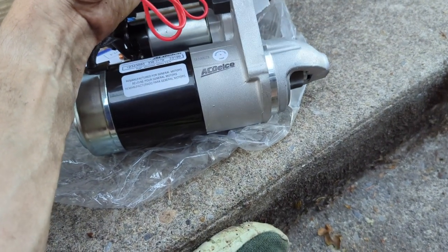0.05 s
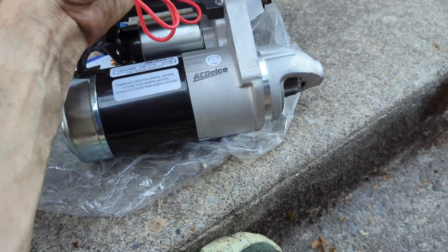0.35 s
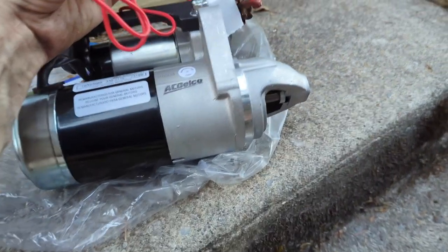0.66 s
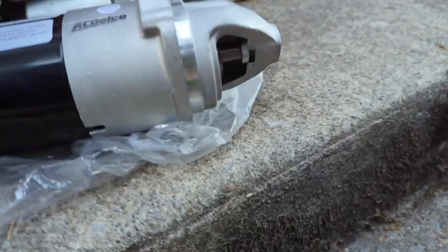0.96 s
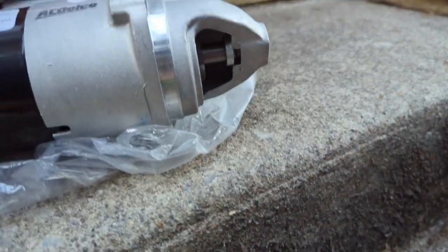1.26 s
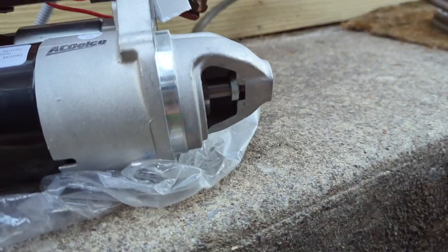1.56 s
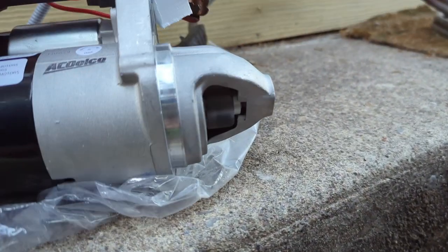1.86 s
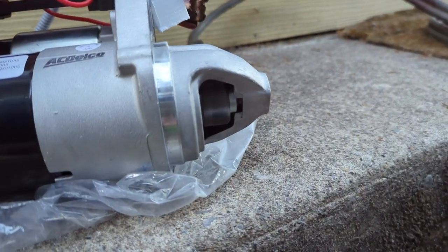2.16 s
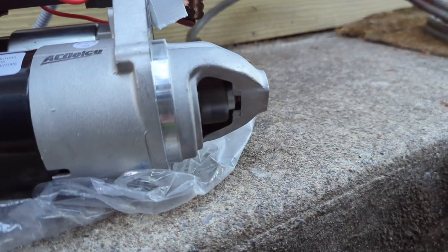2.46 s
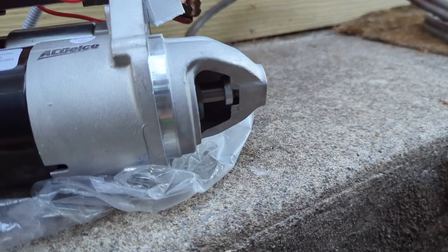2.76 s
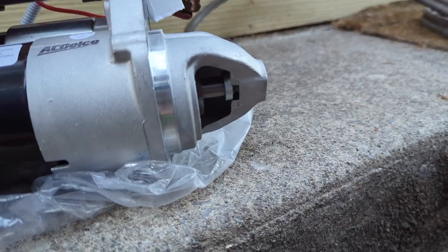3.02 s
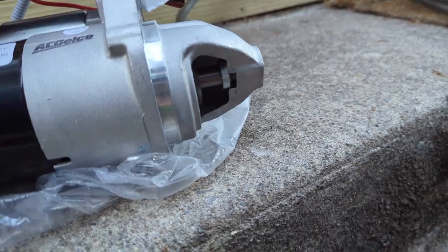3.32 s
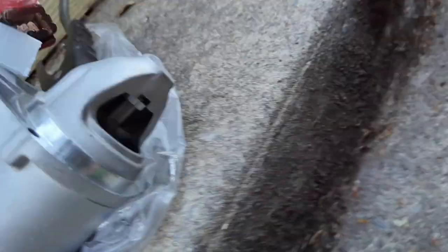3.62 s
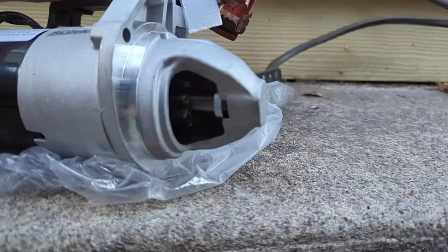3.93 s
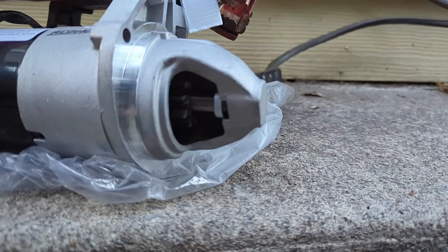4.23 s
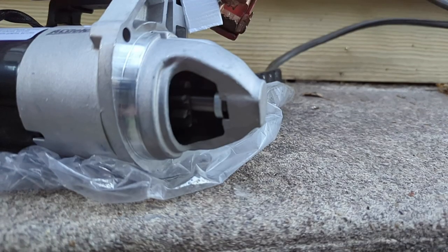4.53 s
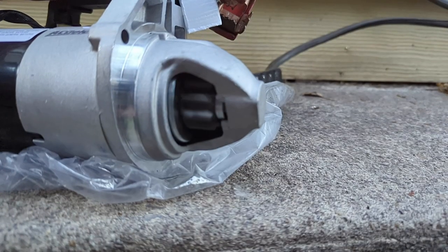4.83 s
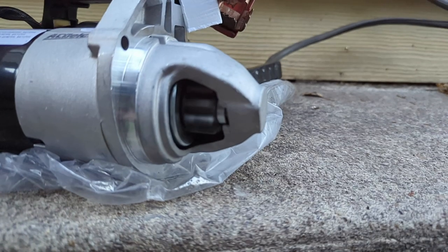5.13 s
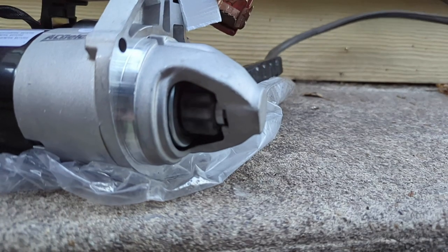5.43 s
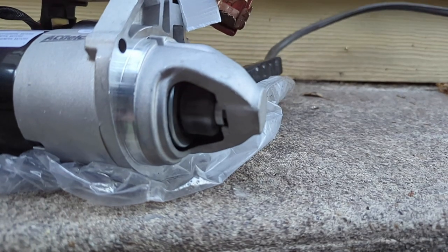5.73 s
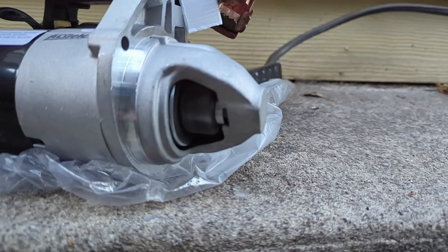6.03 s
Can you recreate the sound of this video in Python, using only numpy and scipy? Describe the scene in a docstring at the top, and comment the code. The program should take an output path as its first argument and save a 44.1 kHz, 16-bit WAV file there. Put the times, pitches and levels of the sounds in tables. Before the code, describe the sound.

A car starter motor whines and coasts down twice with sharp clacks, then sounds slowed down: deep knocks and a rising growl.

```python
"""A rising whine and scrape, then a clack: a car starter motor runs unloaded on a concrete step outdoors,
a phone's two microphones close to its nose. It spins up and coasts down twice. The solenoid clacks in
and out, 23 commutator bars whine and scrape under the brushes, the reduction gear rattles. Then time slows
eightfold: a low hush, and a third start as deep knocks, a beating tone and a slowly rising growl."""
import sys
import numpy as np
from scipy import signal
from scipy.fft import rfft, irfft, next_fast_len
from scipy.io import wavfile
from scipy.ndimage import uniform_filter1d, minimum_filter1d, map_coordinates

SR = 44100
rng = np.random.default_rng(int(sys.argv[2]) if len(sys.argv) > 2 else 0)


def unload_wav(signal):
    """Save mono or channel-first audio to the path in sys.argv[1] as 16-bit WAV at rate SR, clipped to [-1, 1]."""
    wavfile.write(
        sys.argv[1],
        SR,
        np.round(np.clip(np.atleast_2d(signal).T, -1, 1) * 32767).astype(np.int16),
    )


N = 272538
SLOW, SLOW_FROM_S = 8, 3.9
BARS, PINION_RATIO = 23, 4.93  # commutator bars; armature turns to one pinion turn
FREE_HZ = 6457  # bars passing a brush each second at full unloaded speed

# Bright scrape of the brushes at natural speed. Each row: frequency in Hz, level in dB.
BRUSH_SPECTRUM = [(150, -44.5), (700, -9), (2700, -8.5), (3400, -2.5), (4000, -8), (5200, -0.5),
                  (6600, 3.5), (7600, -0.5), (9000, 4), (9800, -3.5), (11800, 6.5), (12800, 2), (14000, 2),
                  (16000, -3), (16900, -22.5), (23500, -18), (26000, -68)]
# Duller rattle of the gears at natural speed. Each row: frequency in Hz, level in dB.
GEAR_SPECTRUM = [(30, -26.5), (110, -9), (260, -13), (480, -13), (750, -7), (1150, 2), (1600, 0.5),
                 (2400, -9.5), (5000, -9.5), (14000, -91)]


def undb(db):
    """Decibels to amplitude."""
    return 10 ** (np.asarray(db) / 20)


def unit(x):
    """Scale to rms 1."""
    return x / np.sqrt(np.mean(x ** 2) + 1e-18)


def lookup(hz, points):
    """Value of (Hz, value) points on a log-frequency axis."""
    f, value = np.transpose(points)
    return np.interp(np.log(hz + 1), np.log(np.sort(f)), value)


def shape(x, response):
    """Filter x with a response given as a function of frequency."""
    size = next_fast_len(x.shape[-1] + 8192)
    hz = np.arange(size // 2 + 1) * SR / size
    return irfft(rfft(x, size) * response(hz), size)[..., :x.shape[-1]]


def colour(x, points, slow=1, tilt_db=0):
    """Give x a spectrum, lowered by the slow-down and tilted per octave; rms 1."""
    return unit(shape(x, lambda f: undb(lookup(f * slow, points) + tilt_db * np.log2(f / SR + 1e-4))))


def walk(t, rate):
    """Smooth random drift with rate new values per unit of t, spread near 1."""
    return map_coordinates(rng.standard_normal(4096), [t * rate], order=2, mode="wrap")


def add(out, start_s, x):
    """Mix x into out from start_s."""
    i = max(int(start_s * SR), 0)
    out[:, i:i + x.shape[1]] += x[:, :out.shape[1] - i]


def slowdown(s):
    """How many times slower than life the sound runs at time s."""
    return SLOW if s > SLOW_FROM_S else 1


def mics(x, slow, scatter_db, lead_rad=0.67, scatter_s=0.0077, lag_s=0):
    """Two close microphones, the left ahead for a positive lead; step and wall scatter echoes to each."""
    # Balance at natural speed and slowed. Each row: frequency as heard in Hz, left minus right in dB.
    natural_balance = [(100, 5.5), (700, 3.5), (1300, -3), (2400, -0.5), (3400, 1.5), (4600, 2),
                       (8000, 4.5), (12000, 13.5)]
    slowed_balance = [(100, 0.8), (200, 0.35), (400, 6.7), (700, 4.9), (1300, 5.1), (2400, 11.9)]
    balance = natural_balance if slow == 1 else slowed_balance
    side = np.array([[1], [-1]])
    t = np.arange(1024 * slow) / SR / slow
    echoes = rng.standard_normal((2, len(t))) * np.exp(-t / scatter_s)
    echoes /= np.sqrt(np.sum(echoes ** 2, axis=1, keepdims=True))
    direct = shape(
        x, lambda f: np.exp(1j * side * (lead_rad * np.tanh(f * slow / 500) + np.pi * f * slow * lag_s)))
    scattered = undb(scatter_db) * signal.fftconvolve(x[None], echoes, axes=1)[:, :len(x)]
    return shape(direct + scattered, lambda f: undb(side * lookup(f, balance) / 2))


def air(outdoor_db=-49, hush_db=-45, side_db=-5):
    """Low outdoor rumble, which sinks to a deeper hush once time slows."""
    # The air in slowed time. Each row: frequency in Hz, spectral level in dB.
    hush_spectrum = [(12, -37), (20, -1.5), (32, -0.5), (57, -29), (81, -17.5), (124, -27), (527, -49.5),
                     (1500, -50.5), (2100, -65), (3000, -93.5), (3900, -109), (6600, -120)]
    t = np.arange(N) / SR
    mid, side = rng.standard_normal((2, N))
    noise = (mid + undb(side_db) * side * np.array([[1], [-1]])) * undb(1.1 * walk(t, 17))
    outdoor = colour(noise, [(20, -21), (50, -7), (100, 0), (200, -12), (600, -17.5), (4000, -56)])
    slowed = np.clip((t - SLOW_FROM_S) / 0.045 + 1, 0, 1)
    return undb(outdoor_db) * outdoor * (1 - slowed) + undb(hush_db) * colour(noise, hush_spectrum) * slowed


def rush(length_s, db, slow):
    """Soft, dull noise that swells and sinks."""
    t = np.arange(int(length_s * SR)) / SR
    noise = colour(rng.standard_normal(len(t)), BRUSH_SPECTRUM, slow, tilt_db=-4)
    return undb(db) * np.sin(np.pi * t / length_s) ** 2 * noise


def thump(hz, length_s, db):
    """The motor rocks on the step: a few soft low cycles."""
    t = np.arange(int(length_s * SR)) / SR
    return undb(db) * np.sin(np.pi * t / length_s) * np.sin(2 * np.pi * hz * t)


def squeal(hz, null_s, db, crest_beats=1.8, spread_beats=1.77, octave_db=-23):
    """As the current rushes in, two close tones beat, swell and fade, with a faint octave."""
    t = np.arange(int(6 * null_s * SR)) / SR
    beats = t / null_s
    swell = np.exp(-((beats - crest_beats) / spread_beats) ** 2 / 2)
    tone = np.sin(2 * np.pi * hz * t) + undb(octave_db) * np.sin(2 * np.pi * 2 * hz * t)
    return undb(db) * swell * np.sin(np.pi * beats) * tone


def blow(thud_db, clang_db, stretch, slow, crunch_t60=0.026, crack_t60=0.011, rise_s=0.00096):
    """Steel hits steel: the housing rings over a short crunch; its low modes are the thud."""
    # The sharp first contact. Each row: frequency in Hz, level in dB.
    crack_spectrum = [(3000, -18.5), (12000, 2.5), (19000, -2.5), (24000, 5.5), (27000, -39),
                      (48000, -55.5), (70000, -93)]
    # The struck housing. Each row: frequency in Hz, level in dB, unstretched seconds to fall 60 dB.
    housing_modes = [(1088, 1, 0.032), (1400, -43.5, 0.036), (2206, 0.5, 0.024), (3044, -6, 0.023),
                     (5410, 2.5, 0.021), (6920, -9.5, 0.12), (8370, 13.5, 0.011), (10050, -19, 0.0053),
                     (11110, -32, 0.0069), (12696, -3, 0.029)]
    t = np.arange(int(0.07 * SR) * slow) / SR / slow
    fall = -np.log(1000) * t / max(stretch, 0.1)
    dull = undb(thud_db) * colour(rng.standard_normal(len(t)), GEAR_SPECTRUM, slow)
    bright = undb(clang_db) * colour(rng.standard_normal(len(t)), BRUSH_SPECTRUM, slow)
    faint_waver = undb(0.05 * walk(t, 900))
    out = (dull + bright) * faint_waver * np.exp(fall / crunch_t60)
    crack = colour(rng.standard_normal(len(t)), crack_spectrum, slow)
    out += undb(clang_db - 4) * crack * np.exp(fall / crack_t60)
    for hz, db, t60 in housing_modes:
        strength_db = thud_db if hz < 3000 else clang_db
        ring = np.exp(fall / t60) * np.sin(2 * np.pi * (hz * t + rng.random()))
        out += undb(strength_db + db - 3) * ring
    attack = 1 - np.exp(-(t / rise_s) ** 2)
    return mics(out * attack, slow, scatter_db=-12.5)


def freewheel(t, turns, slow, ring_hz=1170, decay_turns=0.22, rise_turns=0.043):
    """With the power off the pinion runs loose and knocks once in each of its turns, ringing the gear case."""
    pinion = turns / PINION_RATIO
    age = pinion % 1
    knocks = (1 - np.exp(-(age / rise_turns) ** 2)) * np.exp(-age / decay_turns) * (1 - age)
    ring = np.sin(2 * np.pi * ring_hz * t / slow + walk(t, 260 / slow))
    return unit(knocks * undb(0.85 * walk(pinion, 1)) * ring)


def gears(t, turns, slow, tilt_db, teeth_per_turn=8.1, mesh_db=-2, cogging_db=-19):
    """Loose teeth slap once a pinion turn and rasp around the mesh rate; a lower hum follows the armature."""
    slap = undb(-1.5 * np.cos(2 * np.pi * turns / PINION_RATIO) + 3.7 * walk(t, 170 / slow))
    rattle = colour(slap * rng.standard_normal(len(t)), GEAR_SPECTRUM, slow, tilt_db)
    mesh_hz = teeth_per_turn * np.gradient(turns) * SR * slow
    backlash = 1.48 * walk(turns, 1)  # play between the teeth shifts the phase from turn to turn
    mesh_phase = 2 * np.pi * teeth_per_turn * turns + backlash
    mesh = undb(lookup(mesh_hz, GEAR_SPECTRUM)) * slap * np.sin(mesh_phase)
    cogging = (1 + 0.6 * walk(turns, 0.5)) * np.sin(6 * np.pi * turns)
    return rattle + undb(mesh_db) * mesh + undb(cogging_db) * cogging * np.minimum(mesh_hz / 1500, 1) ** 2


def brushes(turns, slow, tilt_db, tick_db=-2, throb=0.19, spark_db=8.5):
    """Rough spots on the commutator tick at the same angles every turn, over a sliding hiss."""
    spots, n = 4 * BARS, len(turns)
    angle, height = rng.random(spots), rng.standard_normal(spots)
    hiss = rng.standard_normal(n) * (1 + throb * np.cos(2 * np.pi * turns))
    passes = np.arange(int(turns[-1]) + 1)[:, None] + angle
    size = height * undb(spark_db * rng.standard_normal(passes.shape))
    due = passes < turns[-1]
    place = np.interp(passes[due], turns, np.arange(n))
    i, late = place.astype(int), place % 1  # each tick is shared between two samples
    ticks = np.bincount(np.r_[i, i + 1], np.r_[size[due] * (1 - late), size[due] * late], n + 1)[:n]
    ticks = unit(ticks / np.sqrt(np.gradient(turns)))  # equal power at every speed
    return colour(hiss + undb(tick_db) * ticks, BRUSH_SPECTRUM, slow, tilt_db)


def resonance(hz, centre_hz=3395, width_hz=130):
    """Nearness, 0-1, to a resonance, by default the cast nose's: a partial sings as it sweeps through."""
    return 1 / (1 + (2 * (hz - centre_hz) / width_hz) ** 2)


def housing(bar_hz, order, between_db=-44):
    """Level in dB of one whine partial as it passes through the housing's resonances."""
    # Each row: centre in Hz, width in Hz, level in dB for the first partial and for the second.
    resonances = [(950, 230, -33.5, -53.5), (1775, 350, -31, -36), (2377, 260, -38.5, -30),
                  (3197, 130, -15.5, -19), (3420, 190, -15, -24.5), (4237, 900, -26, -30.5),
                  (4923, 580, -21, -28.5), (5966, 470, -24, -29.5), (8180, 900, -41, -21.5),
                  (8916, 200, -48, -20), (10440, 760, -38.5, -24), (11727, 520, -44.5, -15)]
    power = sum(undb(db[order - 1]) ** 2 * resonance(order * bar_hz, hz, width) ** 2
                for hz, width, *db in resonances)
    return 10 * np.log10(power + undb(between_db) ** 2 * bar_hz / 1000)


def overtones(t, turns, bar_hz, slow, fall_db=-2.02, flutter_db=5.5):
    """Partials 3 to 8 of the bar rate glide through the brushes' spectrum and the nose resonance."""
    out = 0
    for k in range(3, 9):
        hz = k * bar_hz
        db = lookup(hz, BRUSH_SPECTRUM) + 17 * resonance(hz) + fall_db * k + flutter_db * walk(t, 35 / slow)
        uneven = 1 + 0.76 * np.cos(2 * np.pi * turns + k)
        phase = k * (2 * np.pi * BARS * turns + 0.2 * walk(t, 250 / slow))
        out += undb(db) * uneven * np.sin(phase) * (hz / slow < SR / 2)
    return out


def whine(t, turns, bar_hz, slow, nose_db, wobble=0.13, rasp=0.2, flutter_db=3.5):
    """Bars pass the brushes; an uneven commutator adds sidebands spaced by the turning rate."""
    phase = 2 * np.pi * BARS * turns + 0.1 * walk(t, 600 / slow)
    out = 0
    for k in (1, 2):
        uneven = 1 + wobble * np.cos(2 * np.pi * turns + k) + rasp * walk(t, 800 / slow)
        db = housing(bar_hz, k) + nose_db * resonance(k * bar_hz) + flutter_db * walk(t, 45 / slow)
        out += undb(db) * uneven * np.sin(k * phase)
    return out


def bar_rate(t, on_s, off_s, slow, spin_up_s=0.359, surge_s=0.107, surge_share=0.228,
             drag_s=1.92, friction_hz_per_s=2800):
    """Bars a second at natural speed: power surges, then climbs; drag and brush friction bring it down."""
    driven_s = (np.minimum(t, off_s) - on_s) / slow
    coasted_s = np.maximum(t - off_s, 0) / slow
    climb = (1 - surge_share) * np.exp(-driven_s / spin_up_s)
    surge = surge_share * np.exp(-driven_s / surge_s)
    reached_hz = FREE_HZ * (1 - climb - surge)
    friction_hz = friction_hz_per_s * drag_s
    return np.maximum((reached_hz + friction_hz) * np.exp(-coasted_s / drag_s) - friction_hz, 200)


def motor(on_s, off_s, end_s, whine_db, nose_db, overtone_db, hiss_db, hiss_tilt_db,
          driven_db, coasting_db, gear_tilt_db, unload_s=0.015):
    """One run of the motor: everything follows the armature's speed and turns."""
    # Each row: bar rate in Hz, then dB of brush hiss, gear rattle under power and gear rattle coasting.
    levels_by_speed = [(516, -43.5, -28.5, -42), (1080, -31, -21, -37), (1730, -27.5, -25, -35.5),
                       (2195, -24, -27.5, -30.5), (4070, -21, -36, -26), (6145, -18.5, -36, -25)]
    slow = slowdown(on_s)
    t = np.arange(int(max(on_s, 0) * SR), int(end_s * SR)) / SR
    bar_hz = bar_rate(t, on_s, off_s, slow)
    speed = bar_hz / FREE_HZ
    turns = np.cumsum(bar_hz / slow) / BARS / SR
    brush_db, loaded_db, loose_db = (lookup(bar_hz, np.array(levels_by_speed)[:, [0, k]])
                                     for k in (1, 2, 3))
    coasting = np.clip((t - off_s) / unload_s, 0, 1)
    loose_gain = coasting * undb(loose_db + coasting_db)
    gear_gain = (1 - coasting) * undb(loaded_db + driven_db) + loose_gain
    # a slow armature draws the most current, which lifts its whine
    current_db = 11 * (1 - coasting) * (1 - speed) ** 2
    tones = undb(whine_db + current_db) * whine(t, turns, bar_hz, slow, nose_db)
    # a slower commutator hisses less, so its partials stand out more
    tones += undb(brush_db + overtone_db - 11 * speed) * overtones(t, turns, bar_hz, slow)
    # the slightly unbalanced armature hums at its turning rate
    tones += undb(-52 + 4.2 * walk(t, 30 / slow)) * speed ** 2 * np.sin(2 * np.pi * turns)
    near, far = (undb(brush_db + hiss_db) * brushes(turns, slow, hiss_tilt_db)
                 + gear_gain * gears(t, turns, slow, gear_tilt_db) for _ in range(2))
    knocks = mics(undb(2.5) * loose_gain * freewheel(t, turns, slow), slow, scatter_db=-9.5, lead_rad=1)
    noise = mics(near, slow, scatter_db=-9.5, lead_rad=0.05, lag_s=0.00026)
    # the far end of the housing reaches the two microphones out of step
    noise += undb(-3) * mics(far, slow, scatter_db=3.5, lead_rad=-1.2)
    fade = np.clip(np.minimum(t - t[0], t[-1] - t) / 0.003, 0, 1)
    return (mics(tones, slow, scatter_db=-17) + noise + knocks) * fade


def scene():
    """Three runs on the step with their blows, squeals and thumps, over the outdoor air."""
    # Each row: power on, power off and end in seconds; whine, nose resonance, overtones and hiss in dB;
    # hiss tilt in dB per octave; driven and coasting rattle in dB; rattle tilt in dB per octave.
    runs = [(-0.42, 0.46, 1.74, 1.5, 6, -7, -7, -1, 3.5, -8, -0.5),
            (1.7312, 2.69, 3.868, 1, -6, -0.5, -5.5, -0.5, -3.5, -6, 1.07),
            (4.893, 9, 6.18, 1, 5.5, -4.5, -5.5, -3.5, -5.5, -4, 2)]
    # Solenoid and pinion. Each row: start in seconds, thud in dB, clang in dB, factor on the ring time.
    blows = [(0.45, -24.5, -22.5, 4), (0.462, -1, -18, 0.27), (0.4743, -9.5, -30, 1.7),
             (0.4915, -10.5, -32, 0.8), (1.7375, -10, -11, 0.56), (1.75, -20, -14.5, 0.68),
             (1.7582, -8, -17, 0.78), (2.68, -12, -8, 0.71), (2.7032, -10, -24.5, 1.28),
             (2.7196, -17.5, -38.5, 3.8), (2.778, -22, -62.5, 0.78), (4.795, -16, -10, 0.44),
             (4.851, -22.5, -38.5, 0.85), (4.892, -19.5, -11.5, 0.86), (4.979, -7.5, -13.5, 0.59),
             (5.233, -9.5, -17.5, 0.56)]
    # Each row: start in seconds, pitch in Hz, seconds between the nulls of the beat, level in dB.
    squeals = [(1.763, 7930, 0.0083, -11), (5.02, 994.5, 0.0899, -11.5)]
    # Each row: start in seconds, pitch in Hz, length in seconds, level in dB.
    thumps = [(1.772, 53, 0.03, -19), (1.974, 247, 0.01, -28.5), (4.798, 124.8, 0.14, -19),
              (5.015, 61, 0.11, -29)]
    out = air()
    for run in runs:
        add(out, run[0], motor(*run))
    for s, thud_db, clang_db, stretch in blows:
        add(out, s, blow(thud_db, clang_db, stretch, slowdown(s)))
    # a rush swells around the first slowed knocks
    add(out, 4.68, mics(rush(length_s=0.34, db=-33.5, slow=SLOW), SLOW, scatter_db=0.5))
    for s, hz, null_s, db in squeals:
        add(out, s, mics(squeal(hz, null_s, db), slowdown(s), scatter_db=-70.5))
    for s, hz, length_s, db in thumps:
        add(out, s, mics(thump(hz, length_s, db), slowdown(s), scatter_db=-22.5))
    return out


def record(dry, low_hz=22, top_hz=15800, ceiling=0.9):
    """The deepest rumble and the top are cut, and the loudest peaks are held down smoothly."""
    lean = signal.sosfilt(signal.butter(2, low_hz, "high", fs=SR, output="sos"), dry)
    needed_gain = np.minimum(ceiling / (np.abs(lean).max(axis=0) + 1e-9), 1)
    held_gain = minimum_filter1d(needed_gain, size=161)
    gain = uniform_filter1d(uniform_filter1d(held_gain, size=81), size=81)
    return signal.sosfilt(signal.ellip(10, 0.2, 80, top_hz, fs=SR, output="sos"), lean * gain)


dry = scene()
out = record(dry)
unload_wav(out)
```